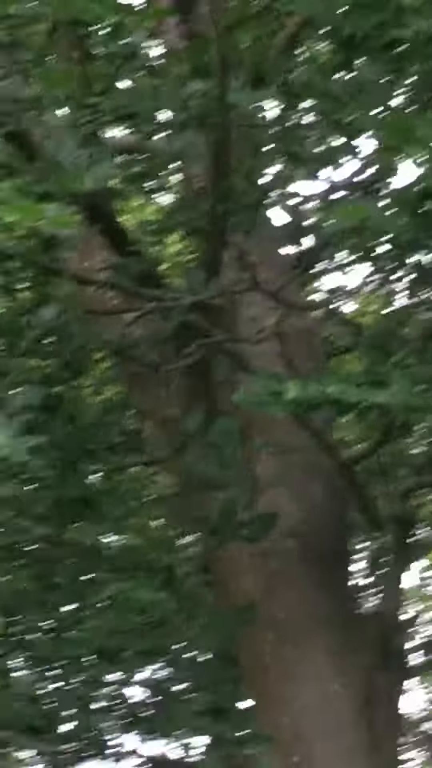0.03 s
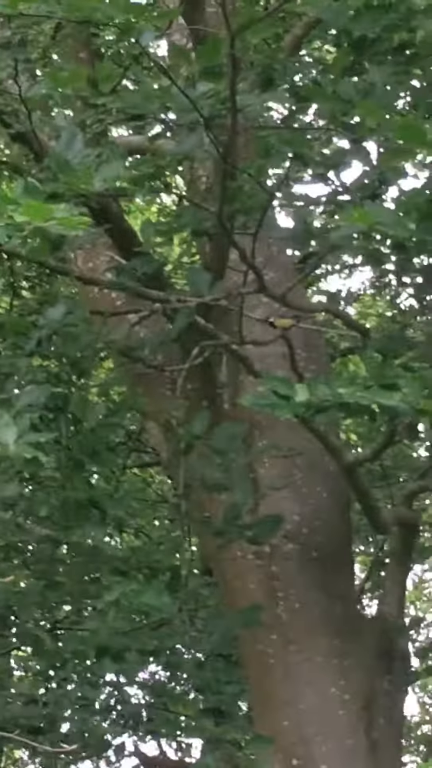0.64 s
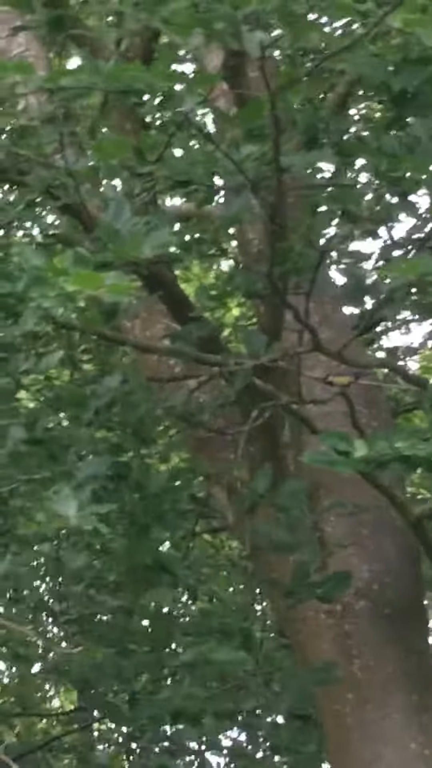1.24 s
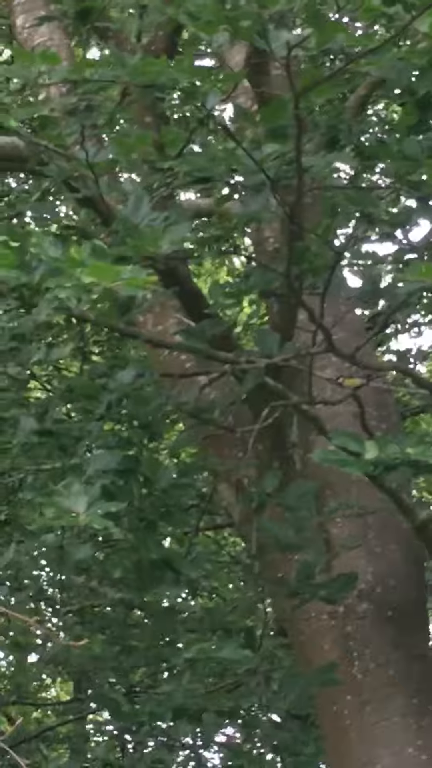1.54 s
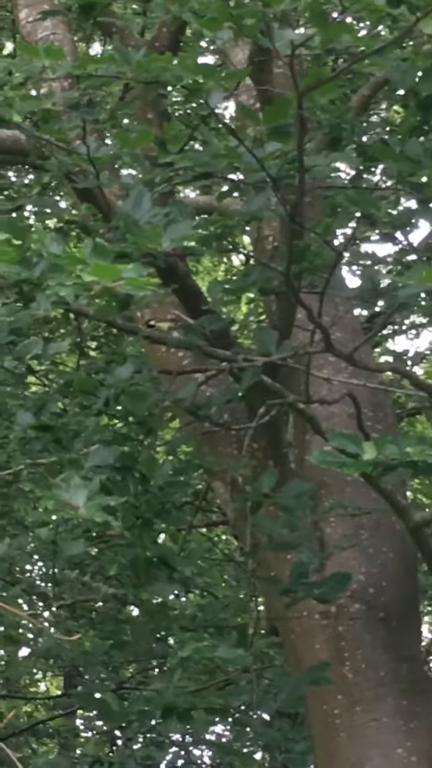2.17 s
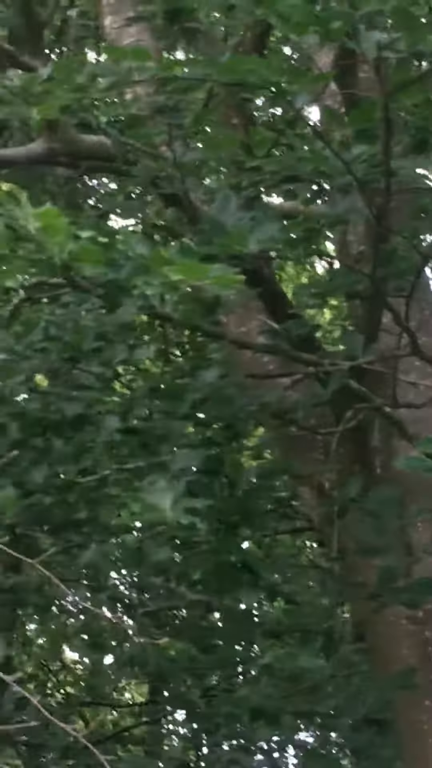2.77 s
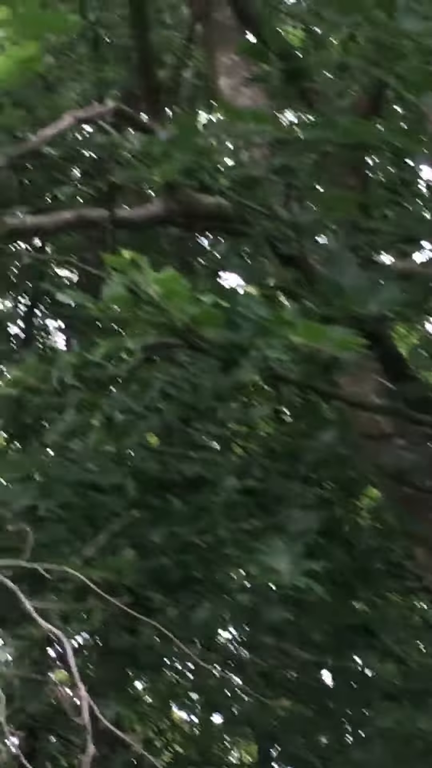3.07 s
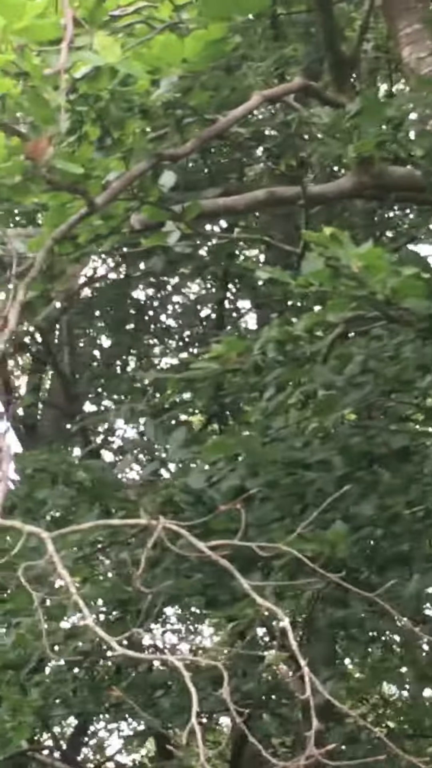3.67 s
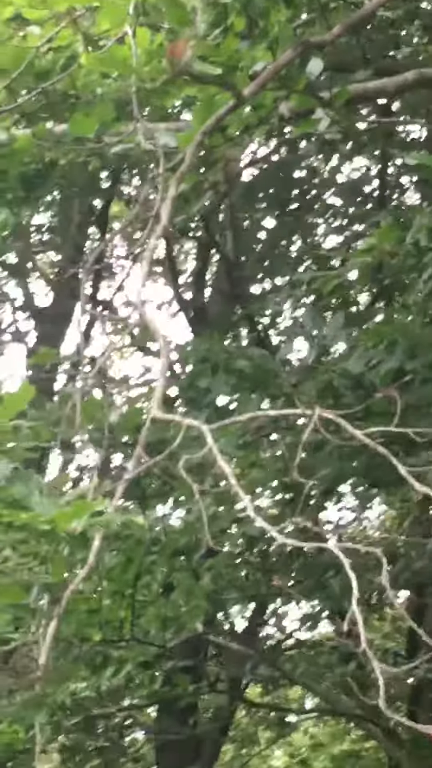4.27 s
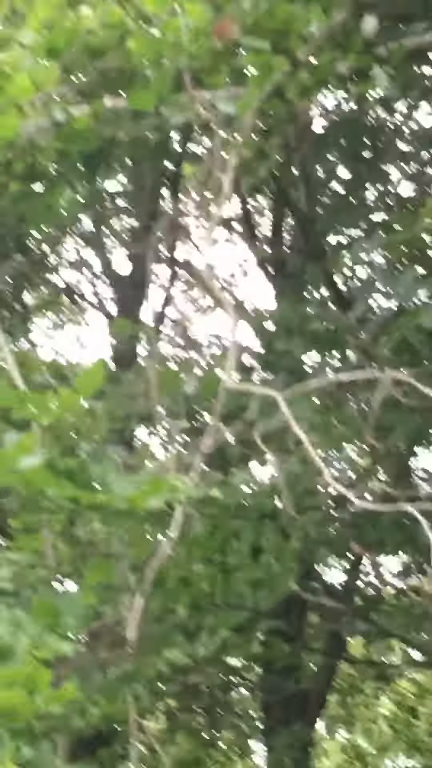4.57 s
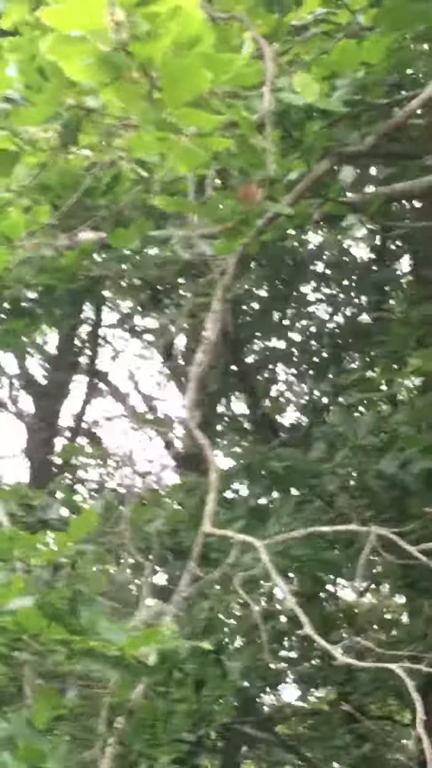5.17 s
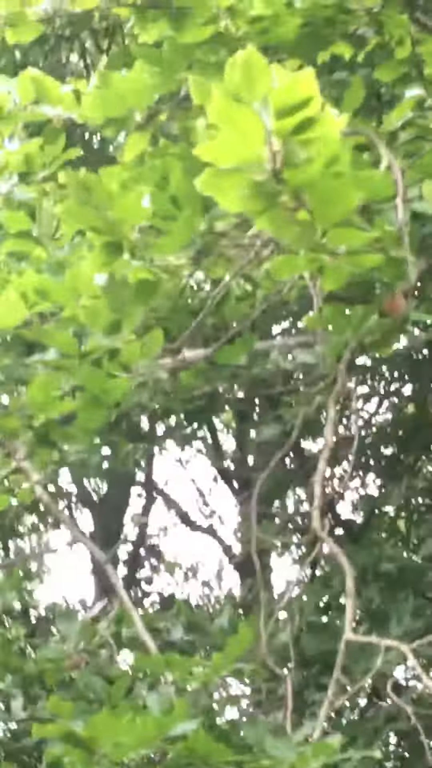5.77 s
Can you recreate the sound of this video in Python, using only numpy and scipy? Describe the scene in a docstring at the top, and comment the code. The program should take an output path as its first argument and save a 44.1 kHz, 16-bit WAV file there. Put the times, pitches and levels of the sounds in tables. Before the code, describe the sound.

A small bird scolds from a nearby tree in harsh, buzzy notes, about ten to fourteen a second, with a light woodland echo. The first run lasts from the start to 1.4 seconds, the second from 1.7 to 2.3, and two short bursts come near 2.7 and 3.3. At 4 seconds it gives one thin, high whistle, then scolds again from 4.2 to 4.5 and from 4.9 to 5.7. Farther off, a finch sings trills that step down in pitch from about 2.3 seconds, ending in a flourish near 4.4. A larger bird calls faintly and hoarsely in the distance, around 1.5, 4 and 5.3 seconds, and very faint piping sounds near 1.4. Throughout, light wind makes an uneven low rumble with soft bumps on the microphone, easing between 4 and 4.8 seconds, over a steady hush of leaves and distant traffic.

```python
"""A great tit scolds from a tree in runs of harsh notes, with one thin whistle before a run.
Each note is a trilling tone plus the rasp of chaotically slapping membranes, shaped by throat and bill.
Farther off a larger bird calls hoarsely, thin piping sounds and a finch sings falling trills;
trunks and a house wall answer. Light air bumps and rumbles on the microphone over a soft hush."""
import sys
import numpy as np
from scipy import signal
from scipy.fft import rfft, irfft, next_fast_len
from scipy.io import wavfile
from scipy.ndimage import uniform_filter1d, map_coordinates

SR = 44100
rng = np.random.default_rng(int(sys.argv[2]) if len(sys.argv) > 2 else 0)


def persist_wave(psi):
    """Save psi, clipped to +-1, as 16-bit WAV."""
    counts = np.round(np.clip(psi, -1, 1) * 32767).astype(np.int16)
    wavfile.write(sys.argv[1], SR, np.atleast_2d(counts).T)


N = 256220
TOP_HZ = 15700


def amp(db):
    return 10 ** (np.asarray(db) / 20)


def unit_rms(x):
    return x / np.sqrt(np.mean(x ** 2) + 1e-20)


def log_interp(points, hz):
    """Read (freq_hz, value) points on a log frequency axis."""
    freqs, values = np.transpose(points)
    return np.interp(np.log(hz + 1), np.log(freqs + 1), values)


def curves(rows, t):
    """Each column after the time, read at times t."""
    times, *columns = np.transpose(rows)
    return [np.interp(t, times, column) for column in columns]


def wobble(rate_hz, size=N):
    """Smooth random curve, rate_hz knots a second."""
    knots = rng.standard_normal(size // 8 + 4)
    return map_coordinates(knots, [np.arange(size) * rate_hz / SR], mode="wrap")


def filtered(x, response):
    """Apply the frequency response response(hz)."""
    size = next_fast_len(len(x) + SR // 5)
    return irfft(rfft(x, size) * response(np.fft.rfftfreq(size, 1 / SR)), size)[:len(x)]


def coloured(x, spectrum):
    """Shape by (freq_hz, gain_db) points; rms 1."""
    return unit_rms(filtered(x, lambda hz: amp(log_interp(spectrum, hz))))


def tone(hz):
    """Sine on a moving pitch; rms 1."""
    return np.sqrt(2) * np.sin(2 * np.pi * np.cumsum(hz) / SR)


def add(track, start_s, sound):
    part = track[max(round(start_s * SR), 0):][:len(sound)]
    part += sound[:len(part)]


# Background spectrum: freq_hz, gain_db
HUSH_SPECTRUM = [(30, -66), (100, -13.5), (250, 2), (450, -3), (750, -4.5), (1100, -4.5), (2000, -8),
                 (3200, -11), (4500, -14), (6500, -20.5), (9000, -30), (12000, -31.5), (15500, -35)]

def hush(level_db=-60):
    """Leaves and distant traffic, almost steady."""
    return amp(level_db + 0.51 * wobble(1.4)) * coloured(rng.standard_normal(N), HUSH_SPECTRUM)


# Slow course of the breeze: time_s, level_db
BREEZE_COURSE = [(0, -43), (.45, -59), (.62, -49.5), (1.27, -48.5), (1.4, -56), (1.55, -44.5), (1.8, -57),
                 (1.92, -47.5), (2.6, -47.5), (2.72, -53), (3.2, -46.5), (4.04, -52), (4.26, -72.5),
                 (4.45, -53), (4.73, -72), (4.88, -53.5), (5.55, -42.5), (5.81, -48.5)]
# Airflow spectrum: freq_hz, gain_db
RUMBLE_SPECTRUM = [(15, -26), (30, -11.5), (45, -1.5), (62, 4), (85, -8), (130, -12.5), (250, -33.5),
                   (600, -71)]
# Strongest eddies: start_s, level_db
AIR_BUMPS = [(.151, -38.5), (.195, -43), (.33, -41), (.748, -48), (1.002, -35), (1.118, -46), (1.225, -42),
             (1.441, -33), (1.529, -37), (1.717, -39.5), (1.928, -39.5), (2.005, -38), (2.092, -40),
             (2.374, -39), (2.424, -36), (2.579, -38), (2.825, -40.5), (2.99, -40), (3.121, -42),
             (3.206, -37.5), (3.261, -40.5), (3.373, -44), (3.422, -43.5), (3.495, -35), (3.551, -44.5),
             (4.855, -46.5), (5.144, -38.5), (5.2, -37), (5.3, -44.5), (5.565, -50)]
# Eddy spectrum: freq_hz, gain_db
BUMP_SPECTRUM = [(25, -9), (60, 7.5), (100, -6), (160, -1.5), (230, -16), (400, -32.5), (900, -101)]

def breeze(rumble_db=-2.5, gust_db=3.6, gust_hz=10, eddies_per_s=6, eddy_db=-1.5, scatter_db=2,
           bump_db=-5, rise_s=0.0086, wake_db=-9, wake_s=0.02, cut_hz=58, cut_q=1.43):
    """Moving air rumbles on the microphone; each eddy bumps it and trails a short swell of rumble."""
    level_db, = curves(BREEZE_COURSE, np.arange(N) / SR)
    flow = coloured(rng.standard_normal(N), RUMBLE_SPECTRUM)
    flow /= np.sqrt(np.abs(uniform_filter1d(flow ** 2, size=SR // 16)) + 1e-6)  # flatten the envelope
    power = amp(level_db + rumble_db + gust_db * wobble(gust_hz)) ** 2
    weak_s = rng.uniform(0, N / SR, round(eddies_per_s * N / SR))
    weak_db = curves(BREEZE_COURSE, weak_s)[0] + eddy_db + scatter_db * rng.standard_normal(len(weak_s))
    bump_age = np.arange(SR // 10) / SR / rise_s
    wake_age = np.arange(SR // 5) / SR / wake_s
    bump_envelope = (bump_age * np.exp(-bump_age)) ** 2
    bumps = np.zeros(N)
    for start_s, db in [*AIR_BUMPS, *zip(weak_s, weak_db)]:
        eddy = coloured(rng.standard_normal(len(bump_age)), BUMP_SPECTRUM) * bump_envelope
        add(bumps, start_s, amp(db + bump_db) * unit_rms(eddy) / 2)
        add(power, start_s, (amp(db + wake_db) * wake_age * np.exp(1 - wake_age)) ** 2)
    # the microphone's low cut rings for a cycle or two
    bumps = filtered(bumps, lambda hz: hz ** 2 / (hz ** 2 - cut_hz ** 2 - 1j * hz * cut_hz / cut_q))
    return np.sqrt(power) * flow + bumps


def foliage(x, decay_s=0.0075, scatter_db=-6):
    """Leaves at the perch smear a note over milliseconds, anew as the bird turns."""
    t = np.arange(SR // 40) / SR
    spray = rng.standard_normal(len(t)) * np.exp(-t / decay_s)
    return signal.fftconvolve(x, (t == 0) + amp(scatter_db) * spray / np.linalg.norm(spray))


# Tree reverberation: freq_hz, t60_s
GROVE_DECAY = [(300, 1), (1500, 0.95), (4000, 0.74), (8000, 0.48), (14000, 0.48)]

def grove(x, block=SR // 3):
    """Scatter from trunks and stirring leaves, new for each block; treble dies first."""
    out = np.zeros(N)
    for start in range(0, N, block):
        hz, t, noise = signal.stft(rng.standard_normal(SR * 3 // 4), SR, nperseg=256)
        piece = x[start:start + block]
        if piece.any():
            decay = amp(-60 * t / log_interp(GROVE_DECAY, hz)[:, None])
            _, tail = signal.istft(noise * decay, SR, nperseg=256)
            add(out, start / SR, signal.fftconvolve(piece, tail / np.linalg.norm(tail)))
    return out


# Early reflections: delay_s, gain_db
REFLECTIONS = [(.0079, -12), (.011, -16)]

def near_tree(x, wet_db):
    """Direct sound, two early reflections and the grove."""
    out = x + amp(wet_db) * grove(x)
    for delay_s, db in REFLECTIONS:
        add(out, delay_s, amp(db) * x)
    return out


# Throat and bill response: freq_hz, gain_db
THROAT_SPECTRUM = [(1350, -17), (1850, -3.5), (2300, -1), (2850, -2.1), (3500, 3), (4200, -5), (4900, -7.5),
                   (5800, -5), (7400, -5.5), (8300, -4), (9400, -4), (10500, -14), (11400, -10.5),
                   (12700, -21.5), (14500, -27), (16000, -30)]

def rasp(t, shake, bill_hz, husk_db, slap_hz=1880, jitter=.24, scatter_db=2.5, bill_db=5, width_hz=550,
         smear_s=.0015, husk_hz=2650, bright_hz=9500, brighten_db_per_s=145):
    """Membranes slap chaotically through throat and bill; the treble opens through the note."""
    cycles = np.cumsum(slap_hz * shake * (1 + jitter * wobble(slap_hz, len(t)))) / SR
    slaps = (np.diff(np.floor(cycles), prepend=0) > 0) * amp(scatter_db * rng.standard_normal(len(t)))
    slaps = filtered(slaps, lambda hz: amp(bill_db / (1 + ((hz - bill_hz) / width_hz) ** 2)))
    # the throat delays the highs and stretches differently each note
    slaps = filtered(slaps, lambda hz: np.exp(-1j * np.pi * smear_s * hz ** 2 / TOP_HZ))
    stretch = 1 + rng.normal(0, 0.0097)
    buzz = coloured(slaps, np.array(THROAT_SPECTRUM) * [stretch, 1])
    buzz = filtered(buzz, lambda hz: amp(husk_db / (1 + (hz / husk_hz) ** 8)))
    treble = filtered(buzz, lambda hz: hz ** 8 / (hz ** 8 + bright_hz ** 8))
    return buzz + (amp(brighten_db_per_s * t) - 1) * treble


# Scolding notes: centre_s, strength_db, bill_hz
SCOLD_NOTES = [(.123, -48.5, 8300), (.197, -46.5, 9200), (.274, -45.5, 8690), (.343, -45, 8674),
               (0.43, -47, 8540), (0.53, -47, 8380), (.619, -47, 8430), (.71, -46.5, 8680),
               (.827, -47.5, 8340), (0.916, -45.5, 8570), (1.035, -47, 8570), (1.124, -47, 8290),
               (1.221, -48, 8270), (1.334, -49, 8340), (1.693, -51.5, 8150), (1.759, -50, 7970),
               (1.819, -50.5, 8430), (1.878, -49.5, 8900), (1.951, -50, 9630), (2.03, -52.5, 7050),
               (2.111, -48.5, 6540), (2.184, -49, 9200), (2.26, -50.5, 7830), (2.634, -53.5, 8000),
               (2.708, -46.5, 8010), (2.781, -46, 9680), (2.853, -50, 6730), (3.191, -50, 9050),
               (3.254, -46, 9020), (3.327, -44.5, 9100), (3.405, -46, 9260), (4.21, -46.5, 7020),
               (4.284, -45.5, 8890), (4.364, -45.5, 9050), (4.49, -50, 8070), (4.878, -49, 8460),
               (4.953, -47.5, 9020), (5.027, -47.5, 8690), (5.105, -49, 8800), (5.225, -51.5, 7150),
               (5.308, -51.5, 6660), (5.398, -50, 8580), (5.54, -51.5, 7230), (5.627, -48.5, 7300),
               (5.713, -47.5, 8240)]
# Course of one note: offset_s, effort_db, pitch_ratio
NOTE_SHAPE = [(-.041, -27.5, .76), (-.028, -13, .88), (-.017, -7.5, 0.85), (-.004, -4.5, 1.24),
              (.006, -4.5, 1.04), (.016, -12, 1.02), (.028, -21, .94)]
# Clearer and hoarser runs: start_s, tone_db, husk_db
SCOLD_RUNS = [(0, -47.5, -6), (1.6, -54, -2), (2.5, -46, -1.5), (4.7, -50.5, -2.3)]

def tit_scolds(voice_db=-0.8, rasp_db=5.0, usual_db=-48, usual_hz=3652, usual_bill_hz=8400, hz_per_db=22,
               trill_depth=.06, trill_hz=135, chaos_depth=.06, chaos_hz=1500):
    """Each note is an arching, trilling tone with a rasp that peaks with the effort."""
    t = np.arange(round(NOTE_SHAPE[0][0] * SR), round(NOTE_SHAPE[-1][0] * SR)) / SR
    effort_db, contour = curves(NOTE_SHAPE, t)
    out, n = np.zeros(N), len(t)
    for centre_s, db, bill_hz in SCOLD_NOTES:
        # harder notes and a wider bill are higher
        pitch_hz = usual_hz + hz_per_db * (db - usual_db) + 0.0549 * (bill_hz - usual_bill_hz)
        _, run_db, husk_db = [run for run in SCOLD_RUNS if run[0] <= centre_s][-1]
        tone_db = run_db + 0.36 * (db - usual_db)
        vibrato = trill_depth * tone(trill_hz * (1 + .25 * wobble(60, n))) / np.sqrt(2)
        shake = 1 + vibrato + chaos_depth * wobble(chaos_hz, n)
        voice = amp(tone_db + voice_db + effort_db) * tone(pitch_hz * contour * shake)
        buzz = amp(db + rasp_db + 0.96 * effort_db) * rasp(t, shake, bill_hz, husk_db)
        add(out, centre_s + t[0], foliage(voice + buzz))
    return near_tree(out, wet_db=-8.5)


def glides(notes, roughness, rough_hz):
    """Swelling, sliding notes roughened by pitch jitter."""
    out = np.zeros(N)
    for start_s, length_s, start_hz, end_hz, db in notes:
        n = max(int(length_s * SR), 64)
        shake = 1 + roughness * wobble(rough_hz, SR)[:n]
        pitch_hz = np.linspace(start_hz, end_hz, n) * shake
        add(out, start_s, amp(db) * signal.windows.tukey(n, .35) * tone(pitch_hz))
    return out


# Larger bird's calls: start_s, length_s, level_db
HOARSE_CALLS = [(.125, 0.11, -67), (1.51, .14, -64), (2.886, .43, -72), (3.76, 0.25, -65),
                (3.936, .28, -63.5), (4.903, 0.11, -70), (5.2, 0.47, -69)]
# Thin piping: start_s, length_s, start_hz, end_hz, level_db
PIPING_NOTES = [(1.26, 0.31, 4740, 4660, -71), (1.52, 0.0907, 5700, 5500, -73)]

def far_birds(call_hz=1332, piping_db=-1):
    """Hoarse calls and thin piping arrive only as scattered sound."""
    calls = [(start_s, length_s, call_hz, call_hz, db) for start_s, length_s, db in HOARSE_CALLS]
    hoarse = glides(calls, roughness=0.0588, rough_hz=353)
    piping = glides(PIPING_NOTES, roughness=.009, rough_hz=249)
    return grove(hoarse + amp(piping_db) * piping)


# Repeated notes: start_s, end_s, period_s, length_s, start_hz, end_hz, level_db, roughness
TRILLS = [(2.326, 2.58, .095, 0.098, 6204, 3610, -64.5, .07),
          (2.871, 3.61, 0.11, .064, 4676, 2660, -52, .058),
          (3.642, 4.02, .0708, 0.0327, 3040, 3715, -53.5, 0.06)]
# Closing notes: start_s, length_s, start_hz, end_hz, level_db
FLOURISH = [(4.13, 0.053, 3476, 3580, -51.5), (4.36, .066, 4960, 4200, -53.5),
            (4.41, .053, 4330, 2770, -52.5)]

def finch(direct_db=-6.5, wet_db=-1.4, fade_db_per_s=4.5):
    """Three far trills step down in pitch and end in a flourish, blurred by the trees."""
    song = glides(FLOURISH, roughness=0.038, rough_hz=1102)
    for start_s, end_s, period_s, length_s, start_hz, end_hz, db, roughness in TRILLS:
        notes = [(note_s, length_s, start_hz, end_hz, db - fade_db_per_s * (note_s - start_s))
                 for note_s in np.arange(start_s, end_s, period_s)]
        song += glides(notes, roughness, rough_hz=1092)
    return amp(direct_db) * song + amp(wet_db) * grove(song)


# Held part of the whistle: time_s, pitch_hz, level_db
WHISTLE_HOLD = [(3.979, 7420, -45.5), (3.991, 7640, -46), (4.009, 7650, -53), (4.033, 7660, -41),
                (4.057, 7570, -39.5), (4.073, 7570, -49.5), (4.086, 7590, -40)]

def tit_whistle(gain_db=1.0, octave_db=-31, rise_s=0.018, fall_s=0.0075, sweep_depth=0.36, fade_db=27):
    """A nearly pure note sweeps up, holds and drops away."""
    start_s, end_s = WHISTLE_HOLD[0][0], WHISTLE_HOLD[-1][0]
    t = np.arange(round((start_s - rise_s) * SR), round((end_s + fall_s) * SR)) / SR
    held_hz, db = curves(WHISTLE_HOLD, t)
    sweep = np.maximum((start_s - t) / rise_s, (t - end_s) / fall_s).clip(0, 1)
    pitch_hz = held_hz * (1 - sweep_depth * sweep ** 2) * (1 + 0.00092 * wobble(200, len(t)))
    voice = tone(pitch_hz) + amp(octave_db) * tone(2 * pitch_hz)
    out = np.zeros(N)
    add(out, t[0], amp(db + gain_db - fade_db * sweep) * voice)
    return near_tree(out, wet_db=-8.0)


def scene():
    """Near bird, far birds and air; mono."""
    return (tit_scolds() + tit_whistle() + finch() + far_birds() + hush() + breeze())[None]


def record(dry):
    """Brick-wall low-pass at TOP_HZ."""
    return np.array([filtered(x, lambda hz: hz < TOP_HZ) for x in dry])


dry = scene()
out = record(dry)
persist_wave(out)
```